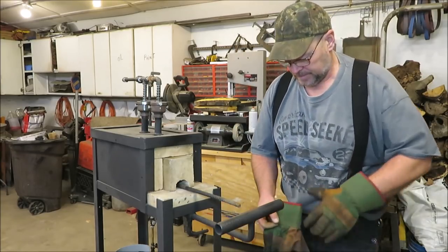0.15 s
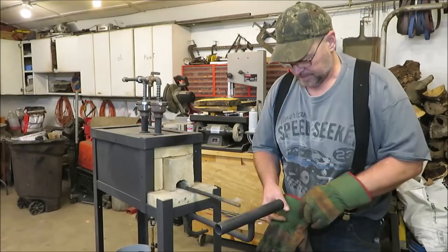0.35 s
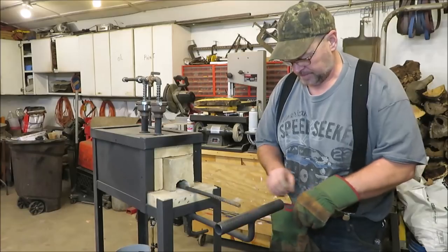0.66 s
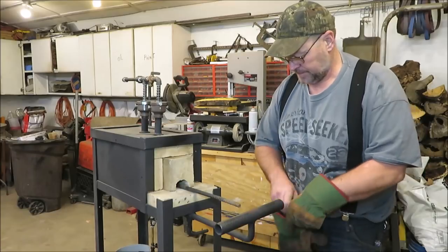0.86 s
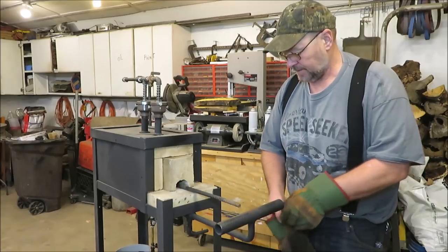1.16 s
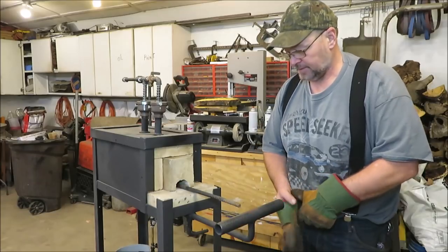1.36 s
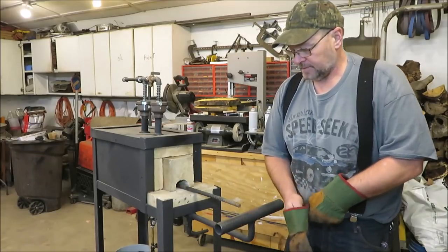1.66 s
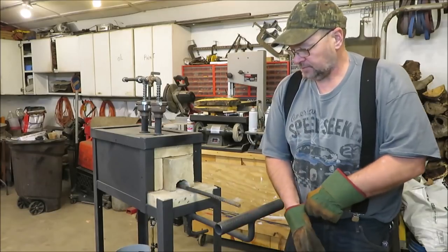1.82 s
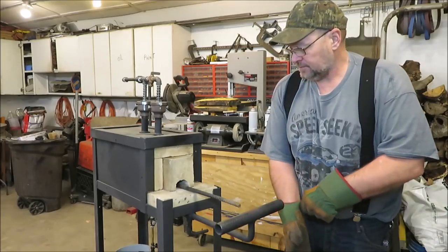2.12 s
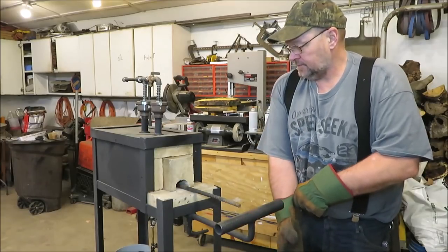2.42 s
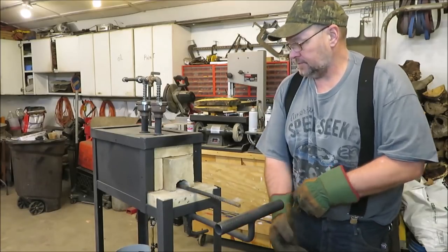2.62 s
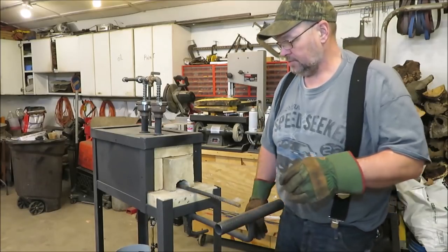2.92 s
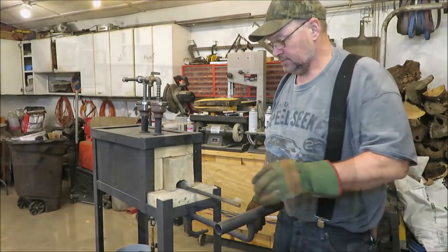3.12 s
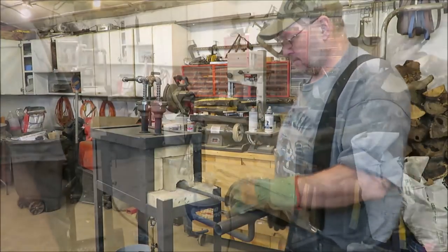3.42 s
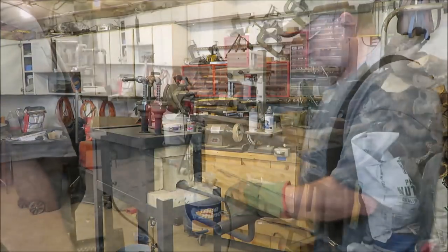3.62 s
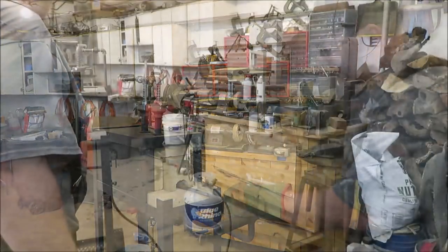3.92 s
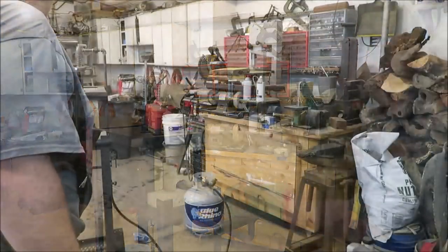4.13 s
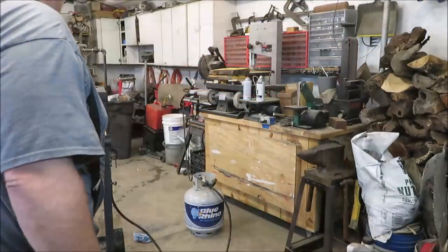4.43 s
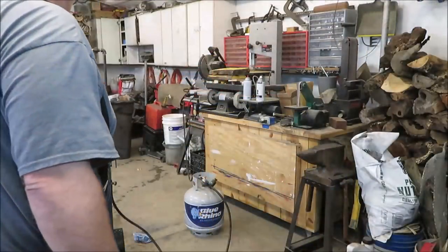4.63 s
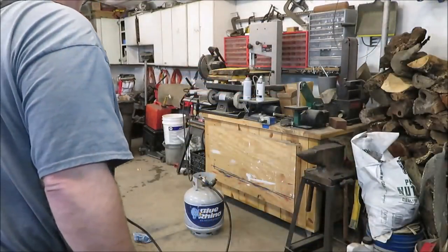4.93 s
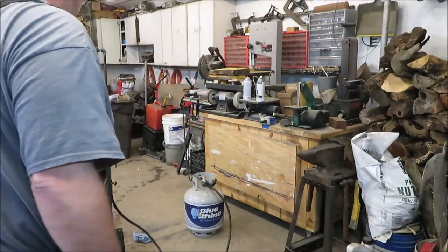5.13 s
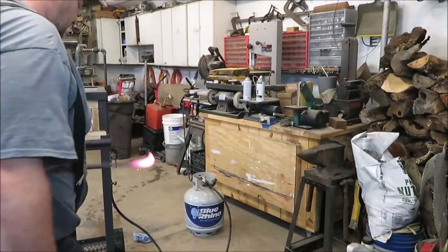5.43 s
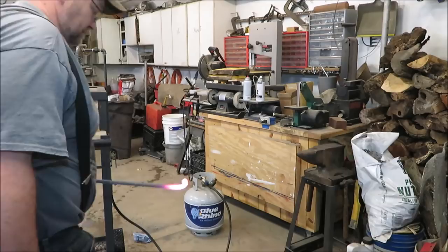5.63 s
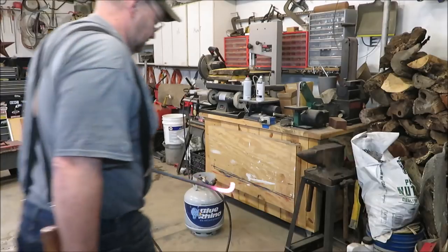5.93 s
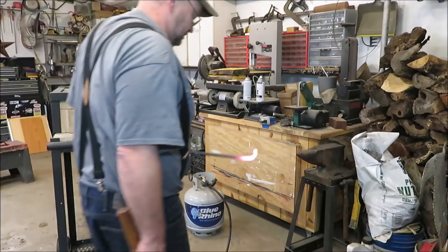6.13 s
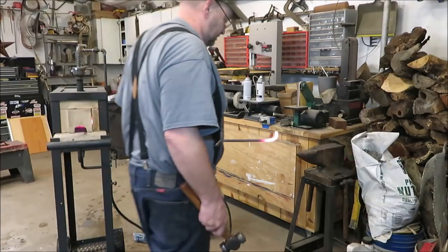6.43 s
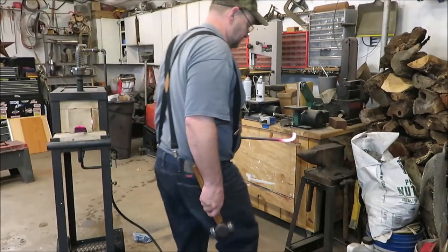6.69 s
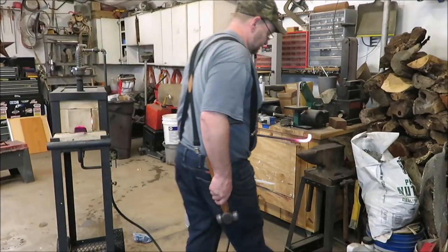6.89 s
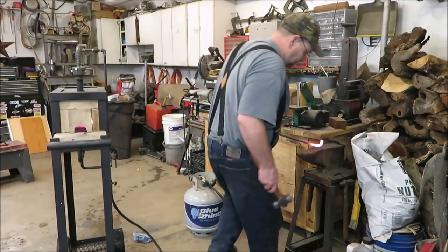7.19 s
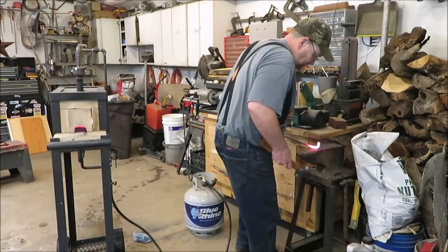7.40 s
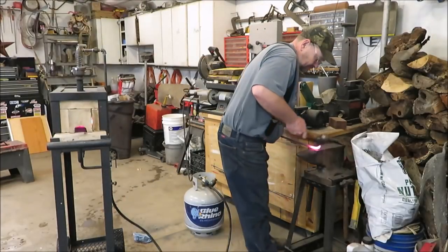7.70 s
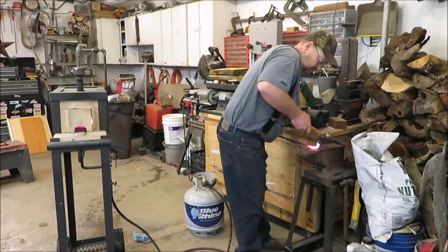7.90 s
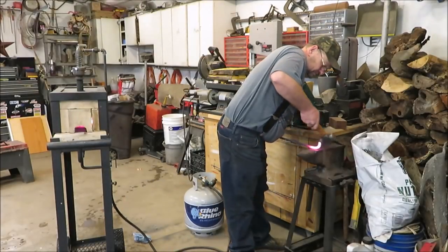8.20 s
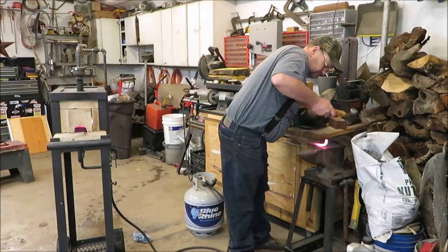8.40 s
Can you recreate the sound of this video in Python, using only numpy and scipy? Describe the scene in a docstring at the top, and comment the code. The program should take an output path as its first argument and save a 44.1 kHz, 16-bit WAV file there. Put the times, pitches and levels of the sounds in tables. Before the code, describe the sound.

Close beside a gas forge, a loud low flame roar swells unevenly under a dull, piping hiss with grainy high spurts. The view crosses over to the open front, where a steadier, fluttering jet hiss with thin whistles and more rumble takes over, marked by two abrupt low bumps. The roar dominates throughout. Near the end small, short metal contacts scrape and tick on the anvil, slightly right, in a small hard workshop.

```python
"""A cluttered workshop with a gas forge: flame roars in the firebox, the burner pipe hisses.
Heard first from beside the forge, with bright bursts in the hiss, then from its open front; the two
positions overlap for a while, and each switch is an abrupt jump. Near the end steel touches the anvil.
Roar, rumble and hiss are noise shaped over frequency, pipe tones are resonances in the hiss, jet whines
are wavering sines, and the steel is short contact noise ringing a set of decaying modes."""
import sys
import numpy as np
from scipy import signal
from scipy.fft import rfft, irfft, next_fast_len
from scipy.io import wavfile
from scipy.ndimage import uniform_filter1d, minimum_filter1d

SR = 44100
rng = np.random.default_rng(int(sys.argv[2]) if len(sys.argv) > 2 else 0)


def wav_record(signal):
    """Record a signal, one row per channel, as 16-bit PCM in the file named by sys.argv[1]."""
    frames = np.transpose(np.atleast_2d(signal))
    bounded = np.clip(frames, -1, 1)
    # unit amplitude maps onto the largest positive 16-bit level
    quanta = np.round(bounded * 32767).astype(np.int16)
    wavfile.write(sys.argv[1], SR, quanta)


N = 377055
TIME = np.arange(N) / SR
SIZE = next_fast_len(N)
HZ = np.maximum(np.arange(SIZE // 2 + 1) * SR / SIZE, 1)

FRONT_IN_S, SIDE_OUT_S = 3.0329, 4.5347   # the front position enters, the side position ends
HISS_FROM_HZ = 600   # hiss is levelled by its part above this

# jet and rumble at the open front: time_s, jet_hiss_db, lift_of_2_to_3_khz_db, rumble_db
FRONT_CURVE = [(3.04, -35, 0.1, -28), (3.54, -30, 1, -29.5), (3.61, -34.5, 0, -28), (4.03, -31, 0.5, -25.5),
               (4.05, -33, -0.5, -27.5), (4.23, -30.5, -0.5, -23), (4.56, -34, 1, -31.5),
               (4.9, -32, .5, -28), (5.05, -31.5, 3, -29), (5.3, -32, 0.5, -28.5), (5.62, -34.5, 0.5, -30),
               (6.13, -33, 2, -29.5), (6.46, -29, 0, -23.5), (7.03, -35, 1.3, -32),
               (7.82, -30.5, -0.3, -27), (7.85, -32, 0.8, -28), (8.4, -31, 1, -29.5), (8.45, -30, 1, -27)]
# burner pipe resonances: pitch_hz, width_hz, level_over_hiss_db
PIPE_MODES = [(348, 16, 18), (364, 8, 12), (401, 16, 13), (445, 16, 9), (474, 12, 11), (494, 8, 10),
              (519, 16, 12), (618, 26, 13), (688, 25, 9), (775, 30, 8), (835, 50, 8), (1730, 50, 5),
              (1782, 44, 11), (1990, 40, 8), (2090, 40, 6), (2600, 50, 10), (2820, 40, 12), (3380, 40, 7),
              (3565, 46, 12.5), (4160, 100, 7), (4400, 30, 7), (4570, 110, 6), (5210, 72, 4), (5950, 74, 4),
              (6280, 40, 5)]
# stereo spread at the microphone beside the forge: frequency_hz, diffuse_over_direct_db
SPREAD_BESIDE = [(60, -40.5), (150, -38.5), (380, -24), (700, -33), (1290, -25.5), (2380, -21), (4400, -10),
                 (8000, 0.5), (15000, 0)]
# stereo spread at the microphone in front: frequency_hz, diffuse_over_direct_db
SPREAD_FRONT = [(60, -34), (150, -40.5), (380, -19.5), (700, -24.5), (1290, -17.5), (2380, -11),
                (4400, -6.5), (8000, 0), (15000, -2)]


def from_db(db):
    """Decibels to gain."""
    return 10 ** (np.asarray(db) / 20)


def rms_one(x):
    """Scale to rms 1."""
    return x / np.sqrt(np.mean(x ** 2) + 1e-20)


def in_time(rows):
    """Columns of a curve table, one value per sample."""
    s, *columns = np.transpose(rows)
    return [np.interp(TIME, s, column) for column in columns]


def gain_over_hz(points):
    """A dB spectrum as gain on the frequency grid."""
    hz, db = np.transpose(points)
    return from_db(np.interp(np.log(HZ), np.log(hz), db))


def humps(modes):
    """Summed power of resonances, each a bell over frequency."""
    return sum(from_db(2 * db) / (1 + (2 * (HZ - hz) / width) ** 2) for hz, width, db in modes)


def drift(rate):
    """Random wandering of rms 1, through this many chance points per second."""
    points = rng.standard_normal(int(rate * N / SR) + 2)
    return rms_one(np.interp(TIME * rate, np.arange(len(points)), points))


def stereo_noise(gain, width, lag_s=0., level_from_hz=0):
    """Direct noise lagging between the channels plus diffuse noise of each; mid rms 1 above level_from_hz."""
    spread = gain_over_hz(width)
    noise = rfft(rng.standard_normal((3, SIZE)))
    direct, left, right = noise * gain / np.sqrt(1 + spread ** 2)
    # lag_s is left behind right at 15 kHz; the lag grows with frequency
    turn = np.exp(-1j * np.pi * HZ * lag_s * (HZ / 15000) ** .7)
    pair = np.array([direct * turn + left * spread, direct / turn + right * spread])
    mid = irfft(pair.mean(0) * (HZ >= level_from_hz), SIZE)
    return irfft(pair, SIZE)[:, :N] / mid.std()


def steadied(x, seconds):
    """Even out swells slower than the given time."""
    span = int(seconds * SR)
    power = uniform_filter1d(uniform_filter1d(x.mean(0) ** 2, span), span)
    return x / np.sqrt(power + 0.063)


def room_ripple(depth_db, spacing_hz):
    """Standing waves of the workshop: a fixed fine ripple over frequency, fading in above the bass."""
    points = rng.standard_normal(1200)
    ripple = np.interp(HZ / spacing_hz, np.arange(1200), points)
    return from_db(depth_db * np.clip(HZ / 1500, 0, 1) * ripple)


def room_tail(x):
    """Dense workshop reflections as decaying noise, different in each channel."""
    t60_s, start_db = 0.27, -33
    after = np.arange(SR // 4) / SR
    fade = from_db(start_db - 60 * after / t60_s) * (after > .004)
    echoes = rng.standard_normal((2, len(after))) * fade
    return signal.fftconvolve(x[None], echoes, axes=1)[:, :N]


def jumps():
    """At each switch the pressure steps down suddenly and swings out at the firebox pitch."""
    # pressure steps at the switches: time_s, height_db
    steps = [(FRONT_IN_S, -7.5), (SIDE_OUT_S, -8)]
    out = np.zeros(N)
    after = np.arange(1000) / SR
    swing = np.cos(2 * np.pi * 260 * after) * np.exp(-after / .003)
    for s, height_db in steps:
        out[round(s * SR):][:1000] = -from_db(height_db) * swing
    return out


def steel():
    """Each touch on the anvil is a tick and a scuff, heard itself and ringing every mode by chance strengths."""
    # touches: time_s, strength_db, top_of_contact_force_hz
    touches = [(7.511, -33, 3800), (7.523, -33.5, 3400), (8.472, -30, 3300), (8.479, -31, 2300),
               (8.4945, -29, 11000), (8.4978, -24.5, 8000), (8.5014, -30, 7000), (8.506, -33, 10000),
               (8.513, -33, 6000), (8.529, -35, 5500), (8.544, -31, 2300)]
    # modes of anvil and bar: pitch_hz, relative_level_db, t60_s
    modes = [(1700, -3, .03), (1880, -3, .04), (2410, -2, .08), (2690, -5, .03), (2985, -4, .04),
             (3640, 3, .025), (4020, 4.5, .022), (4455, -1, .09), (4750, -5, .015), (5150, -6, .025),
             (6620, -8, .025), (7400, -9, .02), (8500, -12, .015), (11380, -11, .03)]
    count, tick_db, scuff_decay_s = len(touches), 16, 0.0012
    force = np.full((count, N), 1e-18)
    scuffs = np.exp(-np.arange(900) / (scuff_decay_s * SR)) * rng.standard_normal((count, 900))
    scuffs[:, 0] = from_db(tick_db)   # first contact
    for row, scuff, (s, strength_db, top_hz) in zip(force, scuffs, touches):
        at = round(s * SR)
        dulled = signal.lfilter(*signal.butter(3, top_hz, fs=SR), scuff)
        row[at:at + 900] = from_db(strength_db) * dulled[:N - at]
    strengths = from_db(rng.normal(0, 1.5, (count, len(modes))))
    out = from_db(-5) * force.sum(0)
    for k, (hz, level_db, t60_s) in enumerate(modes):
        # a two-pole resonator per mode
        r = from_db(-60 / (t60_s * SR))
        w = 2 * np.pi * hz / SR
        ring = signal.lfilter([0, np.sin(w)], [1, -2 * r * np.cos(w), r * r], strengths[:, k] @ force)
        out += from_db(level_db - 24) * ring
    return out * from_db([[-1.5], [1.5]]) + room_tail(out)   # direct sound leans right


def bursts():
    """Gain of the bright bursts: fade in, hold, fade out; those shorter than a fade stay below their level."""
    # bursts near 10 kHz: start_s, length_s, level_db
    rows = [(0.005, 0.076, -63), (0.142, .065, -60), (.22, 0.04, -57), (0.325, .07, -59.5), (0.4, .06, -67),
            (0.52, 0.027, -61), (0.573, 0.016, -66), (.61, 0.021, -68), (0.767, .065, -63),
            (0.86, 0.037, -65), (0.9, .03, -64), (0.965, 0.047, -60), (1.152, 0.02, -59),
            (1.277, 0.027, -63), (1.325, 0.04, -61), (1.375, 0.028, -62), (1.425, .05, -58.5),
            (1.717, 0.059, -59.5), (1.8, 0.023, -57), (1.84, 0.023, -60), (1.876, .035, -61),
            (2.06, 0.015, -70), (2.11, 0.026, -69), (2.17, 0.027, -66), (2.22, 0.073, -61.5),
            (2.348, .06, -62), (2.52, 0.024, -60), (2.608, 0.038, -58), (2.7, .055, -59.5),
            (2.893, .015, -65), (2.97, 0.049, -65)]
    fade_s = 0.03   # centred on the start and on the end
    gain = np.zeros(N)
    for s, length, level_db in rows:
        inside_s = np.minimum(TIME - s, s + length - TIME)
        gain += from_db(level_db) * np.clip(inside_s / fade_s + .5, 0, 1)
    return gain


def surging(hiss):
    """Every pipe resonance wavers in strength on its own; the upper ones also share a slow swell."""
    # upper resonances singing out and sinking back: time_s, swell_db
    sing_curve = [(0, -0.5), (.3, 1.5), (.55, -1.5), (.95, 2), (1.35, 2.5), (1.55, -1), (1.8, 2.5),
                  (2.1, -1), (2.4, 1), (3.0, 1.5)]
    surge_db, surges_per_s, sings_from_hz = 3.0, 9.0, 1700
    sings_db, = in_time(sing_curve)
    out = hiss.copy()
    for hz, width, _ in PIPE_MODES:
        change_db = surge_db * np.tanh(drift(surges_per_s)) + sings_db * (hz > sings_from_hz)
        band = signal.lfilter(*signal.iirpeak(hz, hz / (2 * width), SR), hiss)
        out += (from_db(change_db) - 1) * band
    return out


def beside():
    """Dull hiss coloured by the burner pipe, with grainy bright bursts that also lift the hiss."""
    # hiss colour beside the forge: frequency_hz, relative_density_db
    hiss_colour = [(250, -32.5), (335, -14.5), (450, -20), (570, -25.5), (740, -31.5), (900, -28.5),
                   (1050, -32), (1400, -27.5), (1560, -31.5), (1900, -30.5), (2300, -35.5), (3150, -38),
                   (7000, -47), (10000, -50), (13000, -50), (15500, -67)]
    # where the bright bursts are strongest: frequency_hz, width_hz, relative_level_db
    bright_modes = [(6500, 2300, -11.5), (7450, 58, -6), (8260, 50, -6), (8720, 60, -7.5), (9216, 60, -3),
                    (9330, 90, -2.5), (9616, 70, 2.5), (9842, 50, -2.5), (10035, 60, 3.5), (10250, 90, -3),
                    (10830, 200, -3.5), (11850, 80, -9), (12130, 60, -10.5), (12480, 90, -10),
                    (13200, 1200, -16)]
    hiss_db, rise_db, full_burst_db, bed_db, lag_s = -44.5, 3, -56.5, -67, -3e-5
    burst = bursts()
    colour = gain_over_hz(hiss_colour) * np.sqrt(1 + humps(PIPE_MODES)) * room_ripple(2.3, 22)
    hiss = stereo_noise(colour, SPREAD_BESIDE, lag_s, HISS_FROM_HZ)
    grain = from_db(1.2 * drift(40) + 1.6 * drift(600))
    bright = stereo_noise(np.sqrt(humps(bright_modes)), SPREAD_BESIDE, lag_s) * grain
    lift_db = rise_db * uniform_filter1d(burst, size=4000) / from_db(full_burst_db)
    dull = from_db(hiss_db + lift_db + 0.7 * drift(25)) * surging(hiss)
    # a faint bed of the bright hiss stays on between the bursts
    return (dull + (burst + from_db(bed_db)) * bright) * (TIME < SIDE_OUT_S)


def whines():
    """Thin tones of the jet that waver a little in pitch and come and go."""
    # whines before their swells: pitch_hz, rms_over_hiss_db
    tones = [(621, -15.5), (846, -20.5), (1581, -21), (3161, -24.5), (3618, -30)]
    waver_hz, swell_db = 1.57, 4
    out = np.zeros(N)
    for hz, level_db in tones:
        level = np.sqrt(2) * from_db(level_db + swell_db * drift(5.0))
        cycles = np.cumsum(hz + waver_hz * drift(8.0)) / SR
        out += level * np.sin(2 * np.pi * cycles)
    return out


def in_front():
    """The open front lets out the broad hiss of the jet, its lower and upper parts fluttering at random."""
    # hiss colour in front: frequency_hz, relative_density_db
    hiss_colour = [(60, -58), (250, -26.5), (340, -1), (430, -10.5), (600, -13), (800, -19.5),
                   (1400, -18.5), (1510, -21), (1700, -22), (3100, -29), (3400, -30.5), (4100, -31.5),
                   (7000, -41), (11400, -46.5), (13400, -49.5), (15500, -64)]
    # faint whistles of the jet: pitch_hz, width_hz, level_over_hiss_db
    whistle_modes = [(355, 30, 2), (453, 12, 5), (711, 70, 4), (1010, 20, 3), (1806, 16, 7), (2247, 16, 5),
                     (2479, 27, 3), (2870, 60, 2), (3161, 30, 4), (3690, 60, 5)]
    hiss_db, lift_db, _ = in_time(FRONT_CURVE)
    colour = gain_over_hz(hiss_colour) * np.sqrt(1 + humps(whistle_modes)) * room_ripple(1.7, 20)
    hiss = stereo_noise(colour, SPREAD_FRONT, 3.3e-5, HISS_FROM_HZ)
    body = signal.sosfiltfilt(signal.butter(2, 3000, fs=SR, output="sos"), hiss)
    treble = hiss - body
    hiss = body * from_db(0.29 * drift(16) + 0.78 * drift(120)) + treble * from_db(0.77 * drift(30))
    band = signal.sosfiltfilt(signal.butter(2, [1900, 3200], "band", fs=SR, output="sos"), hiss)
    jet = hiss + (from_db(lift_db) - 1) * band + whines()
    return from_db(hiss_db) * jet * (TIME >= FRONT_IN_S) * from_db([[-.2], [.2]])   # leans right


def flame():
    """Turbulent burning drives the firebox resonance; slower eddies rumble below it."""
    # firebox roar: time_s, roar_db
    roar_curve = [(0.0, -10), (0.3, -13), (0.7, -15.5), (1.4, -11.5), (1.55, -13.5), (2.3, -14),
                  (2.45, -18), (2.62, -8.5), (2.85, -18), (3.05, -9.5), (3.15, -12.5), (3.55, -11),
                  (4.3, -11.5), (4.6, -14.5), (5.4, -12.5), (6.1, -15), (6.25, -14), (7.0, -14.5),
                  (8.5, -12), (8.55, -17)]
    # roar colour beside the forge: frequency_hz, relative_density_db
    beside_colour = [(82, -51), (135, -35.5), (148, -12), (175, -13), (190, -15), (205, -7.5), (221, -3.5),
                     (250, -.5), (272, 1), (288, -2.5), (296, -21), (315, -18), (326, -27.5), (420, -36),
                     (740, -120)]
    # roar colour in front: frequency_hz, relative_density_db
    front_colour = [(82, -43), (140, -18), (186, -31.5), (203, -9.5), (218, -8), (228, -4), (244, -0.5),
                    (258, -6.5), (268, 2), (275, 0.5), (284, 3.5), (303, -12), (315, -4), (326, -35),
                    (420, -53), (740, -120)]
    # rumble colour: frequency_hz, relative_density_db
    rumble_colour = [(20, -48.5), (38, -36), (52, -29), (72, -5.5), (85, -10.5), (105, -8.5), (125, -0.5),
                     (140, -7), (165, 0), (190, -3.5), (250, -27), (420, -100)]
    roar_swell_db, roar_swells_per_s = 2.5, 12   # swells bounded at this depth
    rumble_beside_db, rumble_swell_db, rumble_swells_per_s = -32, 2.5, 8
    roar_db, = in_time(roar_curve)
    rumble_db = in_time(FRONT_CURVE)[-1]
    # share of the roar's power with the side colour: half while the positions overlap
    share = np.where(TIME < FRONT_IN_S, 1, np.where(TIME < SIDE_OUT_S, .5, 0))
    share = uniform_filter1d(share, size=400)
    roar = np.sqrt(share) * stereo_noise(gain_over_hz(beside_colour), SPREAD_BESIDE)
    roar += np.sqrt(1 - share + 1e-9) * stereo_noise(gain_over_hz(front_colour), SPREAD_FRONT)
    swell_db = roar_swell_db * np.tanh(drift(roar_swells_per_s))
    pan_db = 0.13 * np.array([[1], [-1]])   # a little louder on the left
    roar = from_db(roar_db + swell_db + pan_db) * steadied(roar, 0.13)
    side_level = from_db(rumble_beside_db) * (TIME < SIDE_OUT_S)
    front_level = from_db(rumble_db) * (TIME >= FRONT_IN_S)
    level = np.hypot(side_level, front_level)
    rumble = steadied(stereo_noise(gain_over_hz(rumble_colour), SPREAD_FRONT), 0.028)
    return roar + level * from_db(rumble_swell_db * drift(rumble_swells_per_s)) * rumble


def scene():
    """Flame, both listening positions, their switches and the steel."""
    return flame() + beside() + in_front() + jumps() + steel()


def record(dry):
    """A limiter turns the highest swells down; the treble is cut toward 16 kHz."""
    ceiling, span = .99, round(.012 * SR)   # turns down over 12 ms
    needed = ceiling / np.maximum(abs(dry).max(0), ceiling)
    gain = uniform_filter1d(minimum_filter1d(needed, size=span), size=span)
    top_cut = signal.cheby2(14, 35, 16000, fs=SR, output="sos")
    return np.clip(signal.sosfiltfilt(top_cut, gain * dry), -1, 1)


dry = scene()
out = record(dry)
wav_record(out)
```